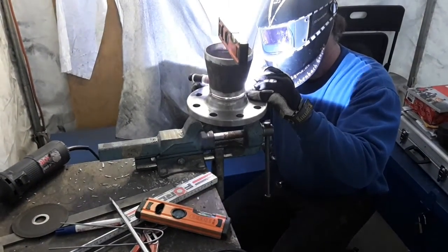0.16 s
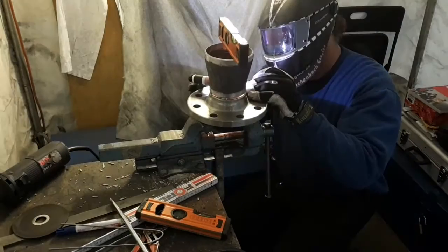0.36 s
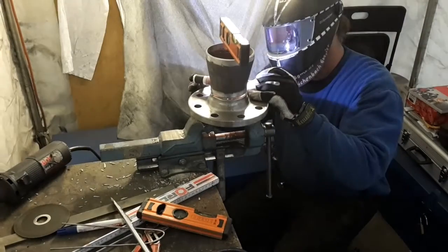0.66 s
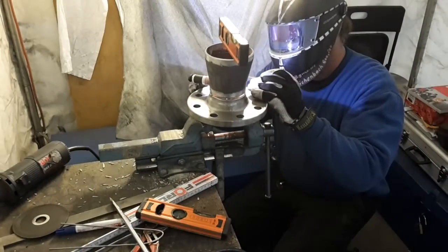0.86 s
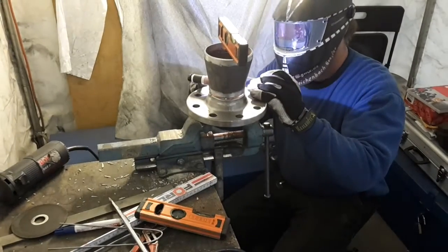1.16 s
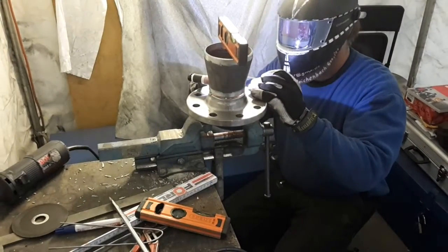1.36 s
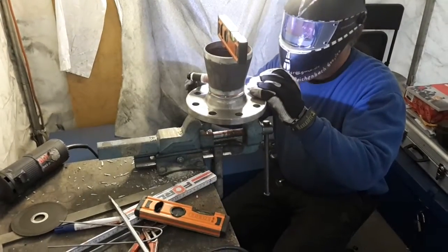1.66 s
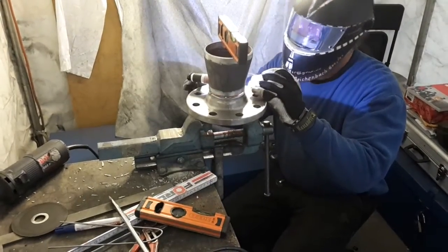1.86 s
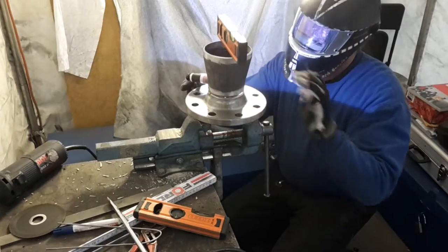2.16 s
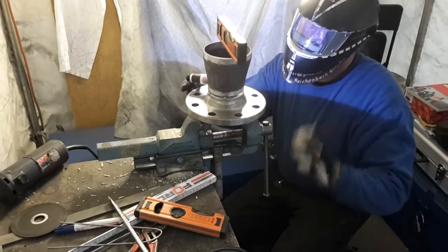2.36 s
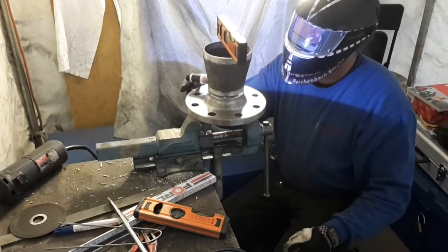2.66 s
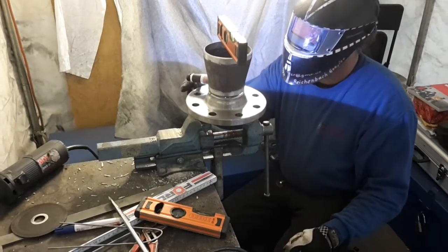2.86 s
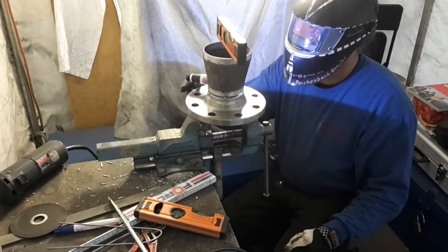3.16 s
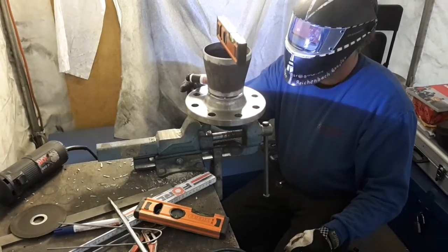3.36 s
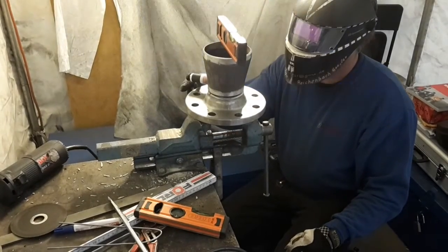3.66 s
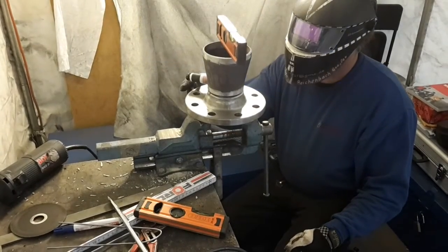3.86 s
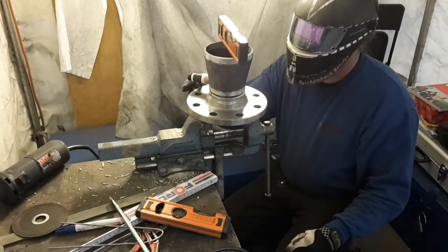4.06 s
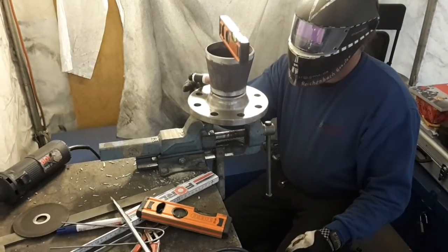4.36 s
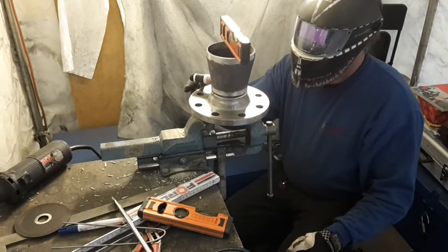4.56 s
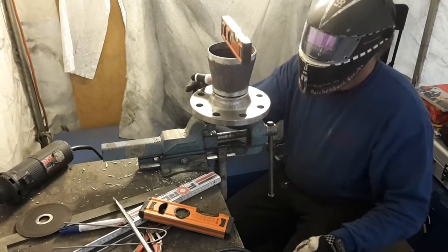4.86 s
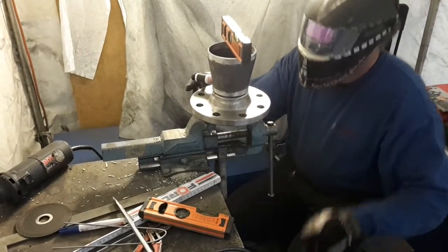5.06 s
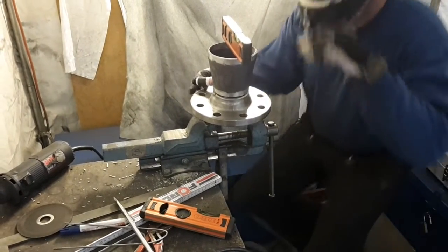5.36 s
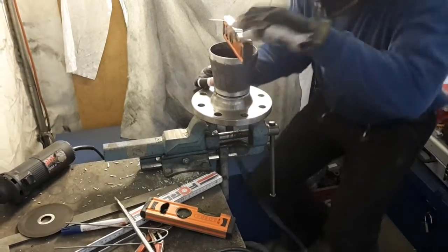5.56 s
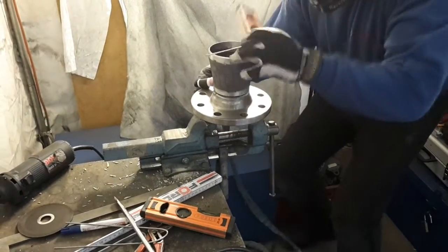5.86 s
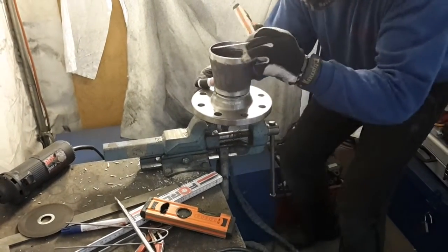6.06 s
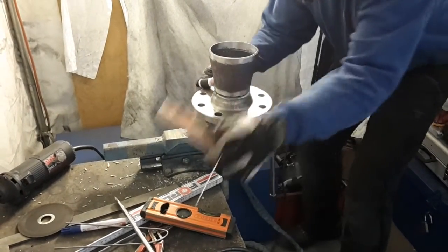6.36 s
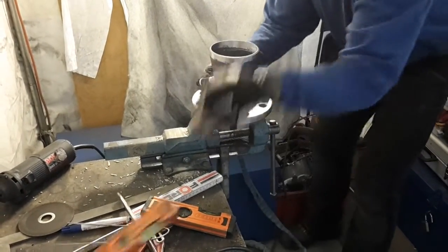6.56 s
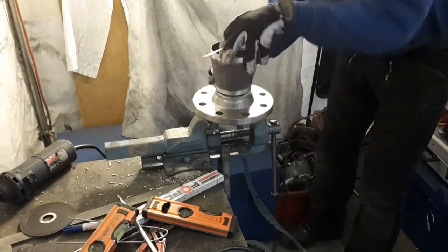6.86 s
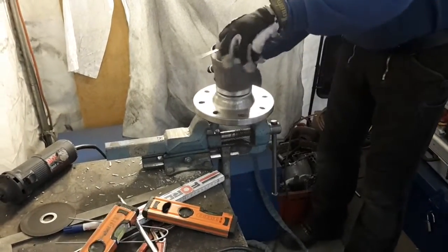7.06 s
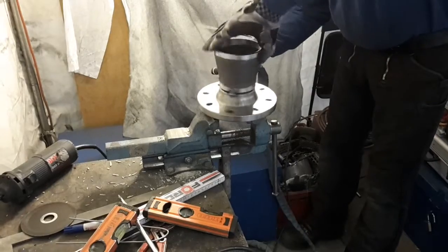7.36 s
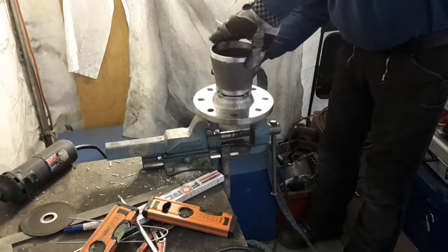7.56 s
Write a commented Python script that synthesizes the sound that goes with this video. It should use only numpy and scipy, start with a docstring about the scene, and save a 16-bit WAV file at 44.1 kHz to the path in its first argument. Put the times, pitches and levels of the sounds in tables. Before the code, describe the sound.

A welding machine hums throughout: low mains buzz, wavering fan tones, a soft rush of air, thin fluttering hiss and faint whistle. At first the arc adds a thin, steady singing tone; around 0.3 seconds it goes out with a small dry double click and dies quickly. Near 1.1 seconds the whistle weakens, leaving steady machine noise. From about 5.7 to 5.95 a spirit level knocks a steel pipe in a rapid cluster, strongest near 5.85, with short hollow ringing stopped by a hand. At 6.64 it clatters onto metal tools, much louder and sharper, with another hit at 6.7 and bright rods rattling until about 6.85. Dull bench thuds accompany the hits. The overall level is pulled down and stays lower, the hiss thinning from 6.9. Muffled, slightly rough glove rubs follow at 7.2, fainter at 7.3 and again at 7.6, with soft bumps. Close stereo pickup, small room.

```python
"""A welding machine hums throughout: mains harmonics, fan tones, low rush of air, thin hiss, faint whistle.
The arc sings on the rectifier ripple and goes out with a double click; the whistle then weakens.
Later a spirit level knocks on a steel pipe in a vise, then clatters onto the tools on the bench and rods rattle:
decaying modes plus coloured noise. Gain control turns everything down and holds; the hiss thins.
Dull bumps, summed from low modes, go with the knocks; last, a glove rubs the pipe as coloured noise, with more bumps."""
import sys
import numpy as np
from scipy import signal
from scipy.fft import rfft, irfft, next_fast_len
from scipy.io import wavfile
from scipy.ndimage import uniform_filter1d

SR = 44100
rng = np.random.default_rng(int(sys.argv[2]) if len(sys.argv) > 2 else 0)


def dump_mix(stems):
    """Bounce the given channels to the path in sys.argv[1] as a 16-bit WAV at rate SR."""
    frames = np.atleast_2d(stems).T  # one column per channel
    limited = np.clip(frames, -1, 1)  # hard clip at full scale
    pcm = np.round(limited * 32767).astype(np.int16)
    wavfile.write(sys.argv[1], SR, pcm)


N = 339553
TIME_S = np.arange(N) / SR

# Table levels are relative: trims, drift, gain control and the overall tone colour act on them later.
# transformer hum: (multiple of mains [1], level [dB], left-right [dB])
HUM_TONES = [(1, -60, 0), (2, -59, -1), (3, -46.7, 1), (4, -46, -1), (5, -53, -1), (6, -52.5, 0),
             (7, -60, 0), (8, -54, 0), (9, -48, -1), (10, -55.5, -8), (11, -62, 0), (12, -61, 0),
             (13, -56, 4), (14, -52, 1), (15, -60, 2), (16, -58, -1), (18, -61, -8), (19, -65, -10),
             (20, -68, 3), (23, -67, 12), (25, -69, 5), (26, -66, 0), (31, -67, 1), (37, -69, 0),
             (39, -69, 0)]
# fan and its motor: (frequency [Hz], level [dB], left-right [dB])
FAN_TONES = [(181, -60, 0), (234.8, -56, 0), (290.7, -55, -4), (325, -61, 2), (374.8, -57, -2),
             (425.3, -59, -2), (514.8, -56, 1), (524.9, -61, -4), (609.8, -53, -2), (625.1, -62, 3),
             (674.9, -62, 0)]
# rush of air and hiss: (frequency [Hz], level per Hz [dB])
AIR_SPECTRUM = [(22, -100), (48, -74.5), (100, -72.5), (170, -71.5), (270, -71.5), (320, -78.5), (450, -76),
                (600, -74.5), (850, -81), (2100, -83.5), (3100, -90), (4400, -90), (9000, -89.5),
                (14500, -96)]
# resonances and one notch in the rush: (centre [Hz], width [Hz], height [dB])
AIR_RESONANCES = [(245.8, 42, 9), (391, 74, 10), (483, 13, 8.5), (726, 91, 5), (897, 21, 6),
                  (1974, 62, 3.5), (6200, 466, -25), (8500, 28, 9), (9550, 140, 1.5), (11220, 60, 3.5),
                  (11400, 55, 4), (11800, 72, 4), (12050, 65, 4)]
# arc on the rectifier ripple: (multiple of mains [1], level [dB], left-right [dB])
ARC_TONES = [(18, -53, -10), (24, -65, 0), (26, -63, 0), (30, -56, 1), (36, -61, 2), (42, -67, -10)]
# faint whistle: (frequency [Hz], level [dB], left-right [dB])
WHISTLE_TONES = [(915, -58, -4), (1587, -66, 0)]

# double click as the arc goes out:
# (time [s], level [dB], treble [dB], crack [dB], ring [dB], hollow ring [dB], favoured band [Hz], boost [dB])
ARC_CLICKS = [(.3105, -29.5, -5, 4, -15, -20, 700, 3), (.324, -36, -5, 0, -15, -15, 2060, 7)]
# spirit level on the pipe:
# (time [s], level [dB], treble [dB], crack [dB], ring [dB], hollow ring [dB], favoured band [Hz], boost [dB])
PIPE_CONTACTS = [(5.7255, -24.5, -10, -4, -10, -4, 955, 13), (5.8015, -26.5, -9.5, 2, -14, 3, 1587, 0),
                 (5.815, -33, -18, 2, -14, 2, 2920, 10), (5.8505, -16.5, 0.5, -0.5, 2.5, -5, 1040, 5.5),
                 (5.868, -26.5, -5, -2, -2, -19, 8150, 6), (5.908, -23.5, -8, -8, -4, -0.5, 1930, 4),
                 (5.945, -41, 7, 1, -16, -15, 9600, 7.5)]
# spirit level on the bench tools, two bursts:
# (time [s], level [dB], treble [dB], crack [dB], ring [dB], hollow ring [dB], favoured band [Hz], boost [dB])
BENCH_CONTACTS = [(6.6363, -8.5, 0, 7.5, 0, -11, 3700, 6.5), (6.643, -17, 6, 5, -5, -15, 10500, 2.5),
                  (6.650, -15, -2, 4, -3, -12, 11700, 7), (6.6565, -18, 0, 6, -9, -10, 9300, -1),
                  (6.7006, -8.5, -1, 12.5, 1, 0.5, 9200, 4), (6.7172, -9.5, 2, 3, 2, -9, 2400, 2),
                  (6.745, -14.5, -7, 8, -15, -8, 680, 9)]
# loose rods rattling:
# (time [s], level [dB], treble [dB], crack [dB], ring [dB], hollow ring [dB], favoured band [Hz], boost [dB])
ROD_CONTACTS = [(6.7728, -17, 6.5, 1, 2, -15, 10500, 3), (6.787, -15, 1, 7, -1, -10, 2650, 2),
                (6.793, -19.5, 2, 2, 0, -17, 9000, 4), (6.818, -24, 5, 2, 9, -20, 12300, 0),
                (6.841, -24, -5, -3, 6, -15, 11200, -2)]

# pipe and flange: (frequency [Hz], level [dB], free t60 [s], left-right [dB])
PIPE_MODES = [(707, -20, .12, -4), (784, -19, .13, 1), (990, -14, .15, -4), (1053, -16, .15, 0),
              (1140, -17, .25, 7), (1253, -21, .15, 4), (1795, -19, .13, 0), (2090, -20, .15, 3),
              (2190, -22, .15, 0), (2422, -21, .15, -3), (2909, -24, .16, 3), (3775, -27, .17, 6),
              (3892, -28, .15, -8), (4367, -22.5, .17, -3), (4702, -25, .16, -3), (8113, -14.5, .42, 8),
              (9491, -22, .27, 0), (10830, -21.5, .48, -3)]
# tools on the bench: (frequency [Hz], level [dB], free t60 [s], left-right [dB])
BENCH_MODES = [(666, -22, .3, 2), (1255, -22, .18, 0), (1560, -21, .24, 0), (1631, -19, .2, 0),
               (1940, -25, .24, -7), (2055, -23, .22, 0), (2365, -20, .25, -4), (2420, -23, .25, 0),
               (2640, -24, .25, 0), (3574, -24, .2, 6), (4077, -25, .2, -8), (4297, -24, .22, 4),
               (4605, -22, .23, 0), (8455, -20, .34, 3), (9243, -20, .18, 2), (9305, -20, .18, 0),
               (9942, -23, .22, 0), (10756, -22, .2, 0), (11797, -20, .34, 0), (12586, -24, .24, -3),
               (12829, -21.5, .3, -3), (14063, -14.5, .22, 0)]
# rods: (frequency [Hz], level [dB], t60 [s], left-right [dB])
ROD_MODES = [(2365, -21, .14, -4), (2640, -20, .14, 0), (4297, -24, .14, 4), (8468, -17, .16, 3),
             (8845, -19, .14, 0), (9560, -22, .16, 0), (10264, -18, .24, 0), (11190, -18.5, .17, 0),
             (12284, -13.5, .14, 0), (13500, -20, .14, 0)]
# hollow spirit level: (frequency [Hz], level [dB], free t60 [s], left-right [dB])
LEVEL_MODES = [(1528, -11.5, .11, 0), (1615, -13, .11, 1), (1960, -8, 0.072, -2), (2550, -12, .1, 0),
               (2900, -13, 0.099, 2)]
# low modes of the bench: (frequency [Hz], t60 [s])
THUD_MODES = [(82, 0.32), (96, 0.23), (157, 0.3), (222, 0.25), (253, 0.34), (280, 0.46), (322, 0.33)]

# noise colour of the arc click: (frequency [Hz], gain [dB])
CLICK_COLOUR = [(100, -2), (600, 9), (1000, 13.5), (2000, 8), (2800, -13), (14000, -25)]
# noise colour of the pipe: (frequency [Hz], gain [dB])
PIPE_COLOUR = [(40, -12), (120, -4), (400, 4), (1050, 5.5), (1450, 3), (2150, 6), (3200, 0), (4000, 0.5),
               (5000, 3), (7000, 1), (14000, 1)]
# noise colour of tools and rods: (frequency [Hz], gain [dB])
BENCH_COLOUR = [(120, -1), (270, 4), (500, -5.5), (950, -3.5), (1500, 1), (2400, 3), (3050, -2.5),
                (3700, -2), (4500, -1), (5500, 2.5), (7400, 0), (9000, 2), (12500, -3), (14000, 0.5)]
# dull bumps: (time [s], level [dB], thud pitch [Hz])
BUMPS = [(5.851, -37, 215), (5.862, -39, 120), (5.914, -33.5, 249), (5.913, -40, 126), (5.962, -38, 215.4),
         (5.98, -37.5, 100), (6.637, -27, 202), (6.697, -23, 272), (6.742, -30.5, 140), (6.795, -30, 243),
         (6.834, -25, 263.5), (7.215, -31, 220), (7.258, -35, 261), (7.35, -36, 236), (7.58, -40, 129),
         (7.66, -36, 208)]
# glove strokes on the pipe: (start [s], length before release [s], level [dB])
STROKES = [(7.17, 0.19, -36.5), (7.323, 0.1, -48.5), (7.574, .14, -38.5)]
# noise colour of the rub: (frequency [Hz], gain [dB])
RUB_COLOUR = [(30, 2), (85, 12), (150, 8), (250, 16), (500, 8.5), (1200, 0), (2000, -1), (3000, -14),
              (6000, -32), (10000, -15), (14000, -25)]
# left-right likeness of room sound: (frequency [Hz], correlation [1])
LIKENESS = [(40, 0.59), (160, 1), (350, 0.95), (600, 0.7), (950, 0.53), (1400, 0.011), (14000, 0.044)]
# left and right tone colour of the whole sound: (frequency [Hz], left gain [dB], right gain [dB])
OVERALL_COLOUR = [(40.2, -3, -4), (218, 0, 0), (2050, -0.5, 0), (4620, 1.5, -1.5), (4920, -16, -1),
                  (5390, -0.5, -9), (6500, -9, -9.5), (7370, 2.5, -3), (7840, -1.5, -8.5), (9490, 11, 4.5),
                  (10600, -2, 9.5), (11700, 7, 12), (13360, 1.5, 9), (15000, -10, -6.5)]

MAINS_HZ = 50
ARC_OFF_S, ARC_T60_S = 0.32, 0.27
WHISTLE_FADE_AT_S, WHISTLE_FADE_S, WHISTLE_FADE_DB = 1.1, 0.23, -4.5
HISS_FADE_AT_S, HISS_FADE_S, HISS_FADE_DB = 6.89, 0.3, -7.5
PIPE_HELD_S = 5.943  # a hand stops the pipe's ring
BENCH_STILL_S = 6.79  # the level comes to lie on the tools and stops their ring
KNOCK_LOWEST_HZ, CONTACT_OCTAVES = 80, 0.12
STROKE_ATTACK_S, STROKE_RELEASE_S = 0.032, 0.22  # time constants
LIMIT_DB, LIMIT_WINDOW_S, LIMIT_ATTACK_S = -12.5, 0.0082, 0.002
CEILING, CUTOFF_HZ = 0.79, 14600


def from_db(db):
    """Decibels to amplitude gain."""
    return 10 ** (np.asarray(db) / 20)


def at_hz(points, hz):
    """A (frequency, value) table read on a log-frequency axis."""
    known_hz, value = np.transpose(points)
    return np.interp(np.log(hz + 1e-9), np.log(known_hz), value)


def bins_hz(size):
    """Frequencies of a real spectrum."""
    return np.arange(size // 2 + 1) * SR / size


def pan(db):
    """Left and right gains for a level difference."""
    return from_db(np.array([[db], [-db]]) / 2)


def drift(rate_hz):
    """Random wandering: normal knots of spread 1, joined by straight lines."""
    knots = rng.standard_normal(int(rate_hz * N / SR) + 2)
    return np.interp(TIME_S * rate_hz, np.arange(len(knots)), knots)


def ramp(start_s, length_s):
    """Rises from 0 to 1, then stays."""
    return np.clip((TIME_S - start_s) / length_s, 0, 1)


def ripple(hz, spacing_hz, heights):
    """Fine random peaks and dips along frequency, weaker in the bass; one row per side."""
    sides = [np.interp(hz / spacing_hz, np.arange(len(side)), side) for side in heights]
    return np.array(sides) * hz / (hz + 900)


def room_noise(gain_db, size):
    """Coloured stereo noise whose left-right correlation follows LIKENESS."""
    hz = bins_hz(size)
    mid, side = rfft(rng.standard_normal((2, size)))
    alike = np.clip(at_hz(LIKENESS, hz), -.99, .99)
    both = np.sqrt((1 + alike) / 2) * mid + np.sqrt((1 - alike) / 2) * side * [[1], [-1]]
    return irfft(both * from_db(gain_db(hz)), size)


def stereo_sine(hz, t):
    """A sine whose left-right phase difference gives the correlation in LIKENESS."""
    apart_rad = np.arccos(np.clip(at_hz(LIKENESS, hz), -1, 1))
    phase = 2 * np.pi * (hz * t + rng.random())
    return np.sin(phase + apart_rad * np.array([[-.5], [.5]]))


def tones(rows, base_hz, waver_db, waver_hz, jitter_s):
    """Tones that waver a little in level and phase."""
    out = np.zeros((2, N))
    for multiple, db, pan_db in rows:
        level = np.sqrt(2) * from_db(db + waver_db * drift(waver_hz))
        jittered_s = TIME_S + jitter_s * drift(waver_hz)
        out += level * pan(pan_db) * stereo_sine(multiple * base_hz, jittered_s)
    return out


def mains_tones(rows):
    """Tones at whole multiples of the mains."""
    return tones(rows, MAINS_HZ, waver_db=1.0, waver_hz=2.936, jitter_s=.00004)


def fan():
    """Wavering tones of the fan and its motor."""
    return tones(FAN_TONES, 1, waver_db=0.8, waver_hz=4, jitter_s=0.000087)


def air_db(hz, ripple_db=4.0, spacing_hz=40):
    """Gain on white noise: slope and resonances of the rush, fine ripple from reflections."""
    peaks_db = sum(db / (1 + (2 * (hz - centre_hz) / width_hz) ** 2)
                   for centre_hz, width_hz, db in AIR_RESONANCES)
    reflections_db = ripple_db * ripple(hz, spacing_hz, rng.standard_normal((2, 2000)))
    density_to_gain_db = 10 * np.log10(SR / 2)
    return at_hz(AIR_SPECTRUM, hz) + peaks_db + reflections_db + density_to_gain_db


def buzz(level_db=-67, spread_db=4.0, slope_db=-8.0):
    """Casing buzz: weak upper harmonics, the same on every turn of the fan (two mains cycles)."""
    size = round(2 * SR / MAINS_HZ)
    hz = bins_hz(size)
    db = level_db + slope_db * np.log2(1 + hz / 1000) + spread_db * rng.standard_normal((2, len(hz)))
    in_band = (hz > 800) * (hz < 2800)
    lines = from_db(db) * np.exp(2j * np.pi * rng.random(db.shape)) * in_band
    turn = irfft(lines, size) * size / np.sqrt(2)
    return turn[:, np.arange(N) % size]


def machine(split_hz=1100, flutter_db=1.0, hum_db=0.23, rumble_db=0.8, hiss_db=1.0):
    """Mains hum, fan, low rush of air, and a fluttering hiss with buzz that thins near the end."""
    air = room_noise(air_db, size=next_fast_len(N))[:, :N]
    rumble = signal.sosfiltfilt(signal.butter(2, split_hz, fs=SR, output="sos"), air)
    hiss = (air - rumble) * from_db(flutter_db * drift(9)) + buzz()
    fade_db = HISS_FADE_DB * ramp(HISS_FADE_AT_S, HISS_FADE_S)
    hum = from_db(hum_db) * mains_tones(HUM_TONES)
    return hum + fan() + from_db(rumble_db) * rumble + from_db(hiss_db + fade_db) * hiss


def whistle():
    """Two thin wavering tones that weaken after the arc and stay weaker."""
    fade_db = WHISTLE_FADE_DB * ramp(WHISTLE_FADE_AT_S, WHISTLE_FADE_S)
    return tones(WHISTLE_TONES, 1, waver_db=2.5, waver_hz=4, jitter_s=0.000087) * from_db(fade_db)


def arc(arc_db=1.0):
    """Rectifier-ripple tones that die in the room once the arc is out."""
    off_s = np.clip(TIME_S - ARC_OFF_S, 0, 1)
    return mains_tones(ARC_TONES) * from_db(arc_db - 60 * off_s / ARC_T60_S)


def struck(modes, contact_db, t, vary_db=1.0):
    """Decaying modes; every contact strikes them with slightly different strengths."""
    out = np.zeros((2, len(t)))
    for hz, db, t60_s, pan_db in modes:
        strength_db = db + contact_db(hz) + rng.normal(0, vary_db)
        out += from_db(strength_db - 60 * t / t60_s) * pan(pan_db) * stereo_sine(hz, t)
    return out


def add(out, start_s, sound):
    """Mix a sound in from start_s on."""
    start = round(start_s * SR)
    out[:, start:start + sound.shape[1]] += sound[:, :N - start]


def knocks(rows, modes, colour, crack_s, tail_t60_s, bass_lasts, rattle_db,
           held_s=N / SR, dense_db=4.0, treble_hz=4000, size=24000):
    """Each contact gives a short crack, an uneven noise tail, and ringing modes of object and level."""
    out, t = np.zeros((2, N)), np.arange(size) / SR
    attack = 1 - np.exp(-t / 0.000093)
    # the many weak modes are the same at every contact
    hz_axis = bins_hz(size)
    body_db = at_hz(colour, hz_axis) + dense_db * ripple(hz_axis, 70, rng.standard_normal((2, 1000)))
    bass_filter = signal.butter(1, 600, fs=SR, output="sos")
    for s, db, treble_db, crack_db, ring_db, hollow_db, spot_hz, spot_db in rows:
        def contact_db(hz):
            """Treble set by the contact's hardness, plus the band favoured by the spot hit."""
            shelf_db = treble_db * hz ** 4 / (hz ** 4 + treble_hz ** 4)
            octaves = np.log2((hz + 1) / spot_hz)
            return shelf_db + spot_db / (1 + (octaves / CONTACT_OCTAVES) ** 2)

        noise = room_noise(lambda hz: body_db + contact_db(hz), size=size)
        bass = signal.sosfilt(bass_filter, noise)
        crack = noise * from_db(crack_db) * np.exp(-(t / crack_s) ** 2)
        # tiny after-contacts and early reflections make the tail uneven
        uneven_db = rattle_db * drift(403)[:size]
        tail = (noise - bass) * from_db(uneven_db - 60 * t / tail_t60_s)
        tail += bass * from_db(-60 * t / (tail_t60_s * bass_lasts))
        ring = from_db(ring_db) * struck(modes, contact_db, t)
        ring += from_db(hollow_db) * struck(LEVEL_MODES, contact_db, t)
        damping = np.exp(-np.maximum(s + t - held_s, 0) / 0.0068)
        add(out, s, from_db(db) * attack * (.5 * (crack + tail) + ring * damping))
    highpass = signal.butter(2, KNOCK_LOWEST_HZ, "high", fs=SR, output="sos")
    return signal.sosfilt(highpass, out + 1e-18)  # inaudible offset


def arc_click():
    """Double click of the arc going out."""
    return knocks(ARC_CLICKS, PIPE_MODES, CLICK_COLOUR, crack_s=0.0028, tail_t60_s=0.12,
                  bass_lasts=0.65, rattle_db=-1.0)


def pipe_knocks():
    """Level on pipe: the steel rings until a hand stops it."""
    return knocks(PIPE_CONTACTS, PIPE_MODES, PIPE_COLOUR, crack_s=0.0071, tail_t60_s=0.18,
                  bass_lasts=2.8, rattle_db=0.5, held_s=PIPE_HELD_S, treble_hz=3700)


def bumps(width_octaves=0.47, rise_s=0.0067, thud_s=0.0084, ring_db=-3.0,
          rough_db=3.5, rough_hz=90, size=24000):
    """A soft contact gives a round thud at its own pitch and leaves nearby low bench modes ringing."""
    out, t = np.zeros((2, N)), np.arange(size) / SR
    for s, db, pitch_hz in BUMPS:
        shares = np.array([1 / (1 + (np.log2(hz / pitch_hz) / width_octaves) ** 4)
                           for hz, t60_s in THUD_MODES])
        shares = shares / np.sqrt(np.sum(shares ** 2))
        ring = sum(share * from_db(-60 * t / t60_s) * stereo_sine(hz, t)
                   for share, (hz, t60_s) in zip(shares, THUD_MODES))
        roughness = from_db(ring_db + rough_db * drift(rough_hz)[:size])
        ring = ring * roughness * (1 - np.exp(-t / rise_s))
        thud = stereo_sine(pitch_hz, t) * t / thud_s * np.exp(1 - t / thud_s)
        add(out, s, np.sqrt(2) * from_db(db) * (thud + ring))
    return out


def bench_clatter():
    """Level on tools: sharp cracks and ringing steel, stopped as the level comes to lie on them."""
    return knocks(BENCH_CONTACTS, BENCH_MODES, BENCH_COLOUR, crack_s=0.0036, tail_t60_s=0.21,
                  bass_lasts=3.5, rattle_db=3.0, held_s=BENCH_STILL_S, dense_db=3.0, treble_hz=6500)


def rod_rattle():
    """Loose rods: bright modes with an uneven noise tail."""
    return knocks(ROD_CONTACTS, ROD_MODES, BENCH_COLOUR, crack_s=0.0032, tail_t60_s=0.21,
                  bass_lasts=3.4, rattle_db=4.0, dense_db=4.5, treble_hz=6500)


def stroke(start_s, length_s):
    """A stroke swells, holds and dies away exponentially."""
    attack = 1 - np.exp(-np.maximum(TIME_S - start_s, 0) / STROKE_ATTACK_S)
    return attack * np.exp(-np.maximum(TIME_S - start_s - length_s, 0) / STROKE_RELEASE_S)


def glove(grain_db=2.0, grain_hz=60, ripple_db=2.0):
    """Leather catches and slips on steel: noise with a fine random ripple of its own, roughened in level."""
    heights = rng.standard_normal((2, 1000))

    def rub_db(hz):
        return at_hz(RUB_COLOUR, hz) + ripple_db * ripple(hz, 77.8, heights)

    noise = room_noise(rub_db, size=next_fast_len(N))[:, :N]
    pressure = sum(from_db(db) * stroke(s, length_s) for s, length_s, db in STROKES)
    return noise / noise.std() * pressure * from_db(grain_db * drift(grain_hz))


def scene():
    """The machine, and the work at the vise and bench."""
    workshop = machine() + whistle() + arc() + arc_click()
    return workshop + pipe_knocks() + bumps() + bench_clatter() + rod_rattle() + glove()


def colour_sides(dry):
    """Left and right each get their own tone colour from a minimum-phase, hence causal, filter."""
    size = 2 * next_fast_len(N // 2 + 4096)
    table = np.array(OVERALL_COLOUR)
    gain_db = [at_hz(table[:, [0, side]], bins_hz(size)) for side in (1, 2)]
    cepstrum = irfft(np.log(from_db(gain_db)), size)
    # fold the cepstrum for minimum phase
    cepstrum[:, 1:size // 2] *= 2
    cepstrum[:, size // 2 + 1:] = 0
    return irfft(rfft(dry, size) * np.exp(rfft(cepstrum)), size)[:, :N]


def gain_control(x):
    """Power above the limit pulls the gain down, and it stays there."""
    power = uniform_filter1d(np.mean(x ** 2, axis=0), max(1, round(LIMIT_WINDOW_S * SR)))
    over_db = np.maximum(10 * np.log10(np.maximum(power, 1e-12)) - LIMIT_DB, 0)
    held_db = np.maximum.accumulate(over_db)
    keep = np.exp(-1 / (LIMIT_ATTACK_S * SR))
    return x * from_db(-signal.lfilter([1 - keep], [1, -keep], held_db))


def record(dry):
    """Tone colour of each side, gain control, rounded peaks, then a steep treble cut."""
    controlled = gain_control(colour_sides(dry))
    rounded = CEILING * np.tanh(controlled / CEILING)
    return signal.sosfilt(signal.ellip(12, .1, 80, CUTOFF_HZ, fs=SR, output="sos"), rounded)


dry = scene()
out = record(dry)
dump_mix(out)
```